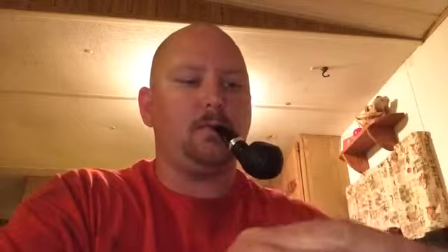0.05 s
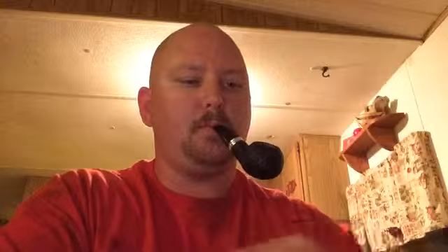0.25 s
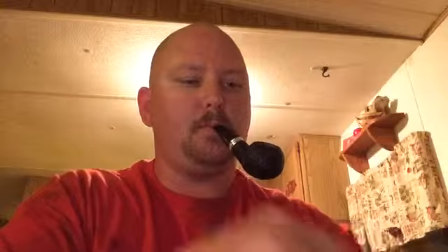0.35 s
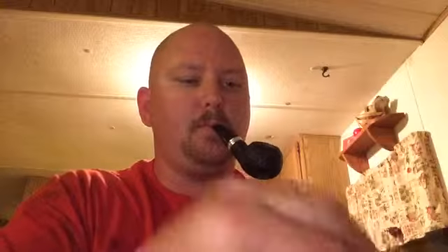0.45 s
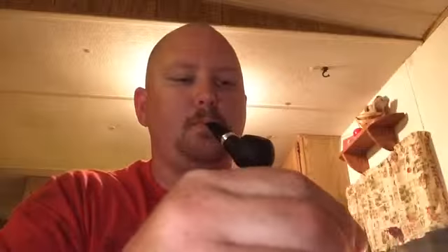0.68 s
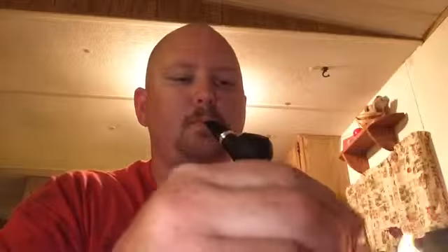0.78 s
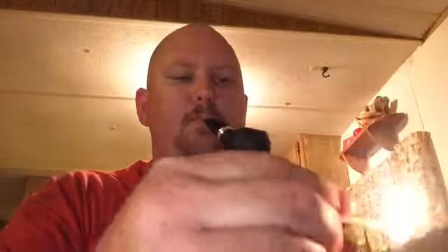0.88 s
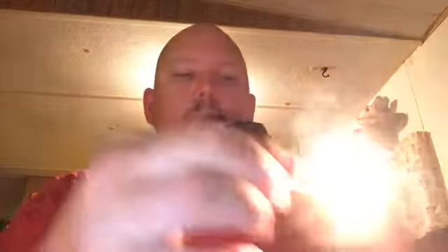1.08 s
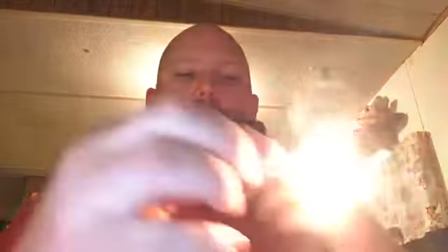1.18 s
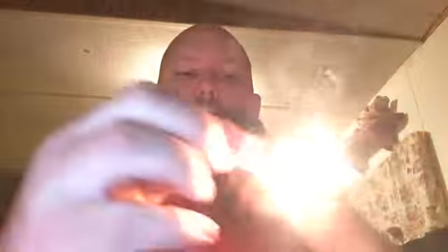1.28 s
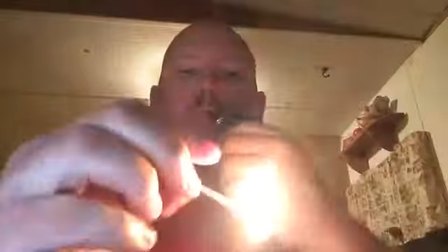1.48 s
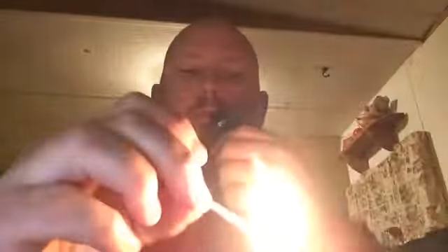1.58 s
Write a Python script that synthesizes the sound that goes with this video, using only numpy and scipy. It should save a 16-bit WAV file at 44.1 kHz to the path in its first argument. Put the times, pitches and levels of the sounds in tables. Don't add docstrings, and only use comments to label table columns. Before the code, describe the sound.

Close up in a small room, a match scrapes and snaps sharply off the box, fingers tick and cloth rustles, a duller second stroke catches with spitting and low flame puffs, fading to faint hiss over low hum.

```python
import sys
import numpy as np
from scipy import signal
from scipy.fft import rfft, irfft
from scipy.io import wavfile
from scipy.ndimage import map_coordinates

SR = 44100
rng = np.random.default_rng(int(sys.argv[2]) if len(sys.argv) > 2 else 0)


def voltage_ratio(decibels):
    exponent = np.asarray(decibels, float) / 20
    return 10 ** exponent


def output_pcm(signal):
    pcm = np.clip(np.atleast_2d(signal).T, -1, 1) * 32767
    wavfile.write(sys.argv[1], SR, np.round(pcm).astype(np.int16))


N = 72765
TIME = np.arange(N) / SR


def unit(x):
    return x / np.sqrt(np.mean(x ** 2) + 1e-20)


def along(points, hz):
    f, v = np.transpose(points)
    return np.interp(np.log(hz + 1), np.log(f + 1), v)


def curve(rows):
    s, db = np.transpose(rows)
    return voltage_ratio(np.interp(TIME, s, db, left=-200, right=-200))


def wobble(rate):
    knots = rng.standard_normal(int(N * rate / SR) + 4)
    return map_coordinates(knots, [np.arange(N) * rate / SR])


def coloured(x, points):
    m = 4096
    level = voltage_ratio(along(points, np.fft.rfftfreq(m, 1 / SR)))
    cepstrum = irfft(np.log(level + 1e-6), m)
    cepstrum[1:m // 2] *= 2
    cepstrum[m // 2 + 1:] = 0
    response = irfft(np.exp(rfft(cepstrum)), m)
    return unit(signal.fftconvolve(x, response)[:N])


def grit(spread_db, clump_db, clump_rate):
    level_db = spread_db * rng.standard_normal(N) + clump_db * wobble(clump_rate)
    return rng.standard_normal(N) * voltage_ratio(level_db)


def add(out, s, x):
    part = out[round(s * SR):][:len(x)]
    part += x[:len(part)]


def ring(hz, db, t60, attack_s):
    t = np.arange(SR // 4) / SR
    return voltage_ratio(db - 60 * t / t60) * np.sin(2 * np.pi * hz * t) * (1 - np.exp(-t / attack_s))


def rings(rows, attack_s):
    out = np.zeros(N)
    for s, db, hz, t60 in rows:
        add(out, s, ring(hz, db, t60, attack_s))
    return out


def clicks(rows):
    out, t = np.zeros(N), np.arange(600) / SR
    f = np.fft.rfftfreq(len(t), 1 / SR) + 1
    cycles, spray_t60, width = 1.2, .007, .6
    for s, db, hz in rows:
        noise = rng.standard_normal(len(t))
        around_pitch = np.exp(-(np.log(f / hz) / width) ** 2)
        spray = unit(irfft(rfft(noise) * around_pitch, len(t))) * voltage_ratio(db - 60 * t / spray_t60)
        tone = ring(hz, db, cycles * 3 / hz, .00005)[:len(t)]
        add(out, s, tone + 0.3 * spray)
    return out


def below(x, top_hz):
    f = np.fft.rfftfreq(2 * N, 1 / SR)
    edge = 1 + np.exp(np.clip((f - top_hz) / 60, -50, 50))
    return irfft(rfft(x, 2 * N) / edge)[..., :N]


AIR_TOP_HZ = 13980


# (frequency [Hz], level [dB])
AIR_COLOUR = [(15, -46.5), (40, -15), (120, -7), (215, -16.5), (320, -14.5), (390, -13.5), (470, -18.5),
              (650, -25.5), (1000, -33), (13600, -53)]


def room_air():
    air = voltage_ratio(-55.5 + 0.7 * wobble(8)) * coloured(rng.standard_normal(N), AIR_COLOUR)
    return below(air, AIR_TOP_HZ)


def mains_hum():
    hum_hz, hum_db, sway_db = 119.7, -50.5, 1.2
    phase = 2 * np.pi * hum_hz * TIME + .2 * wobble(12)
    return voltage_ratio(hum_db + sway_db * wobble(14)) * np.sin(phase)


# (time [s], level [dB])
RUSTLE = [(0, -72), (.07, -72), (.17, -96), (.36, -59.5), (.45, -64), (.53, -58.5), (.58, -63.5),
          (.63, -54), (.66, -58.5), (.7, -55.5), (.76, -61.5), (.92, -64), (1.0, -71.5)]
# (frequency [Hz], level [dB])
RUSTLE_COLOUR = [(290, -31.5), (500, -8.5), (619, 3), (714, -6.5), (1190, -3), (1850, -7), (2230, -10.5),
                 (5310, -8), (15000, -17.5)]


def rustle():
    return curve(RUSTLE) * coloured(grit(4, 1.5, 130), RUSTLE_COLOUR)


# (time [s], peak level [dB], pitch [Hz])
TICKS = [(.024, -52, 5860), (.04, -53.5, 10600), (.063, -53, 6700), (.109, -57, 6900), (.2205, -46, 9000),
         (0.4, -38, 10000), (0.4031, -27.5, 6500), (.405, -38, 2240), (0.4071, -27, 7900),
         (.443, -41, 8100), (0.496, -39, 9000), (.517, -37, 5500), (0.55, -41, 5000), (0.724, -46, 5060),
         (0.7754, -34.5, 8000), (.8505, -33, 9900), (.901, -56, 7880), (.912, -41, 7900),
         (0.925, -60, 6880)]


def finger_ticks():
    return clicks(TICKS)


# (time [s], level [dB])
DRAG = [
    (.187, -62),
    (.191, -50.5),
    (.204, -42.5),
    (.212, -36.5),
    (.228, -38.5),
    (.243, -38),
    (.262, -31.5),
    (.283, -39.5),
    (.3, -51),
    (.38, -69.5),
]
# (start time [s], end time [s])
SPEED_UP_S = (.195, .225)
# (frequency [Hz], level [dB])
SLOW_COLOUR = [(240, -43), (400, -27), (772, -1.5), (1170, -9), (1760, -1), (2790, -20.5), (3160, -6.5),
               (15500, -40.5)]
# (frequency [Hz], level [dB])
DRAG_COLOUR = [(240, -39), (400, -14), (715, -16.5), (987, -9.5), (1400, -15.5), (1990, -12.5), (2250, -17),
               (6090, -24.5), (15500, -38.5)]
# (time [s], peak level [dB], pitch [Hz], t60 [s])
CATCHES = [(.1905, -43, 1700, .02), (.1985, -37.5, 780, .025), (.2005, -39.5, 1800, .02),
           (.2035, -38.5, 800, .025), (.2135, -36, 1900, .015), (.2168, -34.5, 1800, .015),
           (.2212, -27.5, 1050, .025), (.228, -30, 950, .015), (.234, -27.5, 1200, .012),
           (.2367, -26.5, 1000, .015), (.2386, -25, 1050, .015), (.2435, -24.5, 900, .012),
           (.246, -26.5, 800, .015), (.2765, -25.5, 1750, .015), (0.2817, -30.5, 1510, .015),
           (.289, -39.5, 660, .04), (.341, -42, 1700, .02), (.348, -47.5, 1020, .02),
           (.359, -47.5, 1560, .025), (.194, -40, 2090, .012), (.207, -35, 1983, .012),
           (0.212, -37, 2400, .01), (0.2316, -31, 2093, .01), (.2375, -30.5, 2210, .01),
           (.241, -30.5, 1900, .01)]


def drag():
    rub = grit(4, 2.5, 400)
    speed = np.interp(TIME, SPEED_UP_S, (0, 1))
    slow = (1 - speed) * coloured(rub, SLOW_COLOUR)
    fast = speed * coloured(rub, DRAG_COLOUR)
    return curve(DRAG) * (slow + fast) + rings(CATCHES, 0.00031)


# (start time [s], length [s], level [dB], rise [s], t60 of the fall [s])
SNAPS = [
    (.2476, .0012, -32, .0005, .006),
    (.2493, .0037, -18, .0003, .008),
    (.2545, .002, -19, .0008, .005),
    (.2575, .0057, -17.5, .0002, .012),
    (.2635, .005, -27, .0005, .03),
    (0.7965, 0.004, -28, 0.0015, 0.013),
    (.802, 0.003, -28, 0.0009, 0.013),
    (.8065, .002, -33, .0006, .01),
]
# (frequency [Hz], level [dB])
SNAP_COLOUR = [(200, -20), (500, -11.5), (1560, -11.5), (4200, -9), (5600, -3.5), (7400, -2), (9000, -10.5),
               (12500, -8), (15500, -30)]
# (frequency [Hz], level [dB])
SECOND_COLOUR = [(120, -17.5), (260, -14.5), (585, -2), (1430, -9), (3680, -10.5), (5490, -12),
                 (6350, -10.5), (12900, -25), (15500, -54)]
# (time [s], level [dB], pitch [Hz], t60 [s])
THUMPS = [
    (.2475, -24, 165, .03),
    (.249, -30, 330, .025),
    (.258, -27, 400, .035),
    (.2595, -24, 660, .045),
    (.262, -30, 540, .03),
    (0.7975, -32, 370, 0.03),
    (0.801, -41, 205, 0.08),
    (.7978, -26, 540, 0.04),
    (.799, -31, 840, .03),
]
# (time [s], peak level [dB], pitch [Hz])
BURSTS = [
    (.2506, -4, 10500),
    (.2585, -7, 7000),
    (.2605, -8, 12500),
    (.272, -12, 10500),
    (.2745, -22, 8000),
    (.333, -35, 11000),
    (.368, -40, 9000),
    (.7982, -20, 2000),
    (.8036, -16, 6500),
]


def snaps():
    grains = grit(3.5, 1.2, 900)
    second = TIME >= .5
    tear = np.where(second, coloured(grains, SECOND_COLOUR), coloured(grains, SNAP_COLOUR))
    out = rings(THUMPS, 0.00033) + clicks(BURSTS)
    for s, length, db, rise, fall in SNAPS:
        onset = (TIME > s) * (1 - np.exp(-abs(TIME - s) / rise))
        fading = voltage_ratio(db - 60 * np.maximum(TIME - s - length, 0) / fall)
        out += onset * fading * tear
    return out


# (time [s], peak level [dB], box pitch ratio)
TAPS = [
    (0.4758, -28.5, 1.043),
    (0.7762, -20, 1.01),
]
# (frequency [Hz], level [dB], t60 [s])
BOX = [(550, -12.5, 0.022), (987, 6, 0.0061), (1300, -40, 0.0063), (1590, -15, 0.031),
       (2630, -13.5, 0.0086), (3660, -18.5, 0.011), (4700, -15.5, 0.0079), (6400, -11, 0.0056)]


def box_taps():
    out = np.zeros(N)
    for s, db, ratio in TAPS:
        knock = sum(ring(hz * ratio, db + level, t60, 0.00051) for hz, level, t60 in BOX)
        add(out, s, knock)
    return out


# (time [s], level [dB])
FLARE = [(.779, -48), (.79, -53), (.798, -36.5), (.815, -43), (.833, -42), (.85, -45.5), (.86, -47),
         (.878, -49), (.89, -55), (.915, -71), (.935, -91)]
# (frequency [Hz], level [dB])
FLARE_COLOUR = [(210, -13.5), (350, -14), (798, -4.5), (1910, -8), (2240, -12.5), (4570, -13),
                (10400, -28.5), (15500, -45)]
# (time [s], boost [dB], t60 [s])
SPURTS = [
    (0.828, -17, .03),
    (0.839, -8, 0.013),
    (0.8394, 9, 0.011),
    (0.848, 10, 0.028),
    (0.8657, 13.5, 0.011),
    (0.8708, 13, 0.01),
    (0.8752, 12.5, 0.011),
    (0.885, 9.5, 0.022),
    (.901, 16, 0.0095),
    (0.908, 19, 0.019),
]


def sputter():
    spurt = 1 + sum((TIME > s) * voltage_ratio(db - 60 * abs(TIME - s) / t60) for s, db, t60 in SPURTS)
    return curve(FLARE) * spurt * coloured(grit(3.1, 2.4, 370), FLARE_COLOUR)


# (time [s], level [dB], pitch [Hz], t60 [s])
FLAPS = [
    (.800, -45, 55, .15),
    (.842, -28, 135, .06),
    (.857, -31, 125, .06),
    (.874, -36, 170, .05),
    (.884, -36, 74, .3),
]


def flame_flaps():
    return voltage_ratio(2) * rings(FLAPS, 0.0018)


# (time [s], peak level [dB], pitch [Hz])
CRACKLES = [(.8392, -27, 4500), (.842, -30, 4000), (.8485, -28, 1600), (.8655, -30, 3000),
            (.8702, -25, 3200), (.875, -28, 3700), (.8765, -28, 3000), (1.2655, -51, 4200),
            (1.37, -51, 3800), (1.431, -49, 3500), (1.4452, -43, 3700), (1.4622, -42, 3500),
            (1.5346, -48, 3300), (1.64, -48, 3600)]


def crackles():
    out = np.zeros(N)
    for s, db, hz in CRACKLES:
        add(out, s, ring(hz, db + 2, 5 / hz, .00005))
    return out


# (time [s], level [dB])
HISS = [(.88, -85), (.95, -73), (1.08, -68), (1.17, -66.5), (1.25, -67.5), (1.31, -64), (1.36, -63.5),
        (1.41, -69), (1.46, -66), (1.52, -70.5), (1.65, -70)]
# (frequency [Hz], level [dB])
HISS_COLOUR = [(530, -39), (900, -14), (1080, 1.5), (1970, -7.5), (2500, -4), (3770, 0.5), (6140, -8),
               (8250, -8), (13600, -18.5)]


def flame_hiss():
    return below(curve(HISS) * coloured(grit(4, 1.2, 110), HISS_COLOUR), AIR_TOP_HZ)


# (frequency [Hz], t60 [s])
ROOM = [(200, .3), (2000, .3), (5000, .22), (9000, .19), (14000, .13)]


def room(x):
    hz, t, z = signal.stft(rng.standard_normal(SR // 2), SR, nperseg=256)
    fading = voltage_ratio(-60 * t / along(ROOM, hz)[:, None])
    tail = signal.istft(z * fading, SR, nperseg=256)[1]
    late = np.pad(x, (200, 0))
    return signal.fftconvolve(late, tail / np.linalg.norm(tail))[:N]


def scene():
    match = drag() + snaps() + sputter() + flame_flaps() + crackles()
    near = finger_ticks() + box_taps() + match
    background = room_air() + mains_hum() + rustle() + flame_hiss()
    return (near + voltage_ratio(-18) * room(near) + background)[None]


def top_cut(x):
    return signal.sosfilt(signal.butter(12, 16110, fs=SR, output="sos"), x)


def record(dry):
    low_hz, top_hz = 40, 15250
    f = np.fft.rfftfreq(2 * N, 1 / SR)
    without_bass = irfft(rfft(dry, 2 * N) * f / (f - 1j * low_hz))[:, :N]
    mix = below(without_bass, top_hz)
    return top_cut(mix)


dry = scene()
out = record(dry)
output_pcm(out)
```